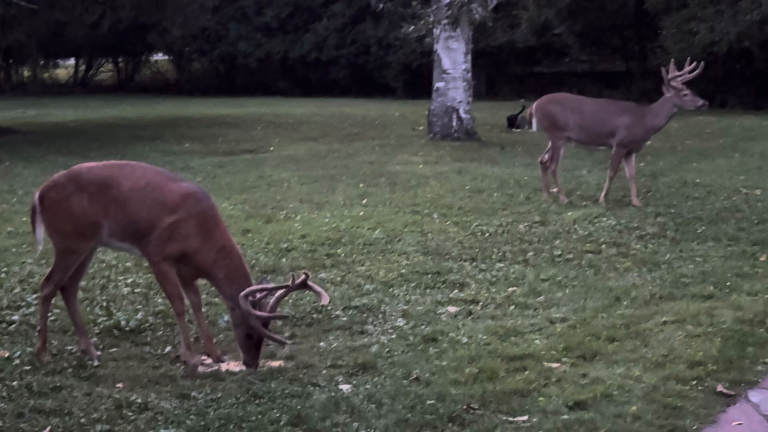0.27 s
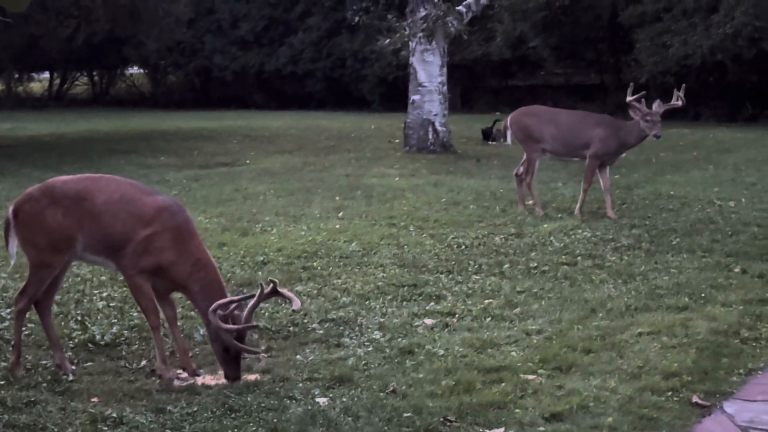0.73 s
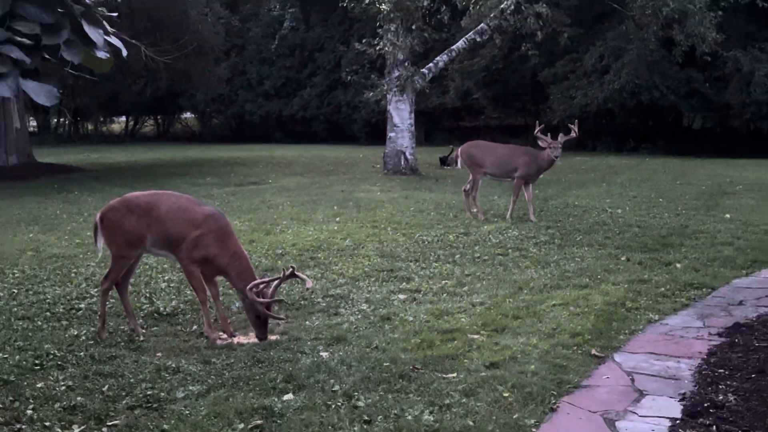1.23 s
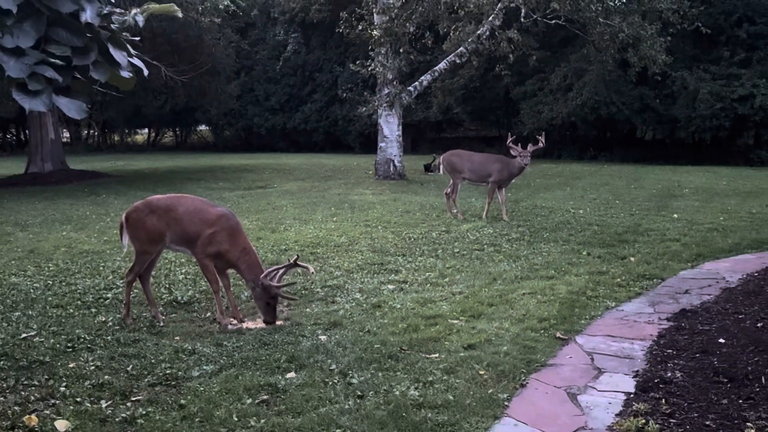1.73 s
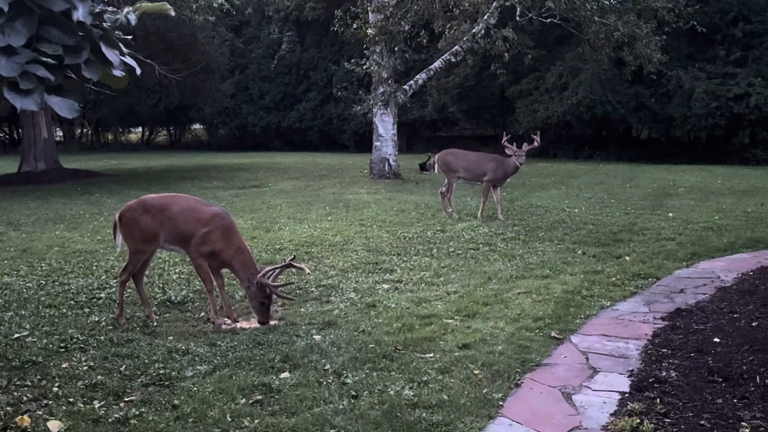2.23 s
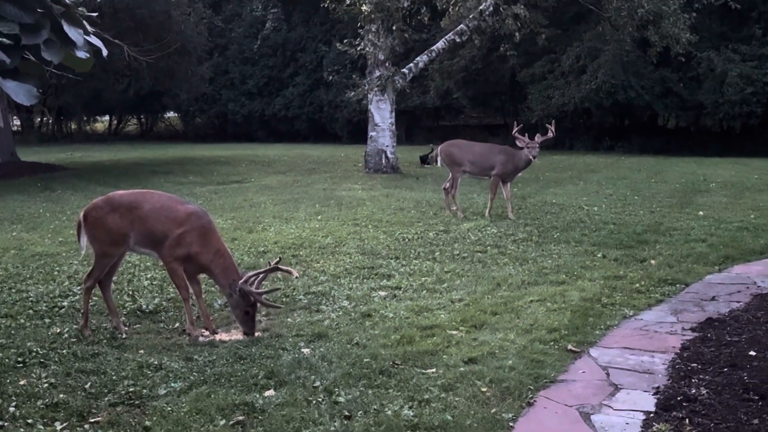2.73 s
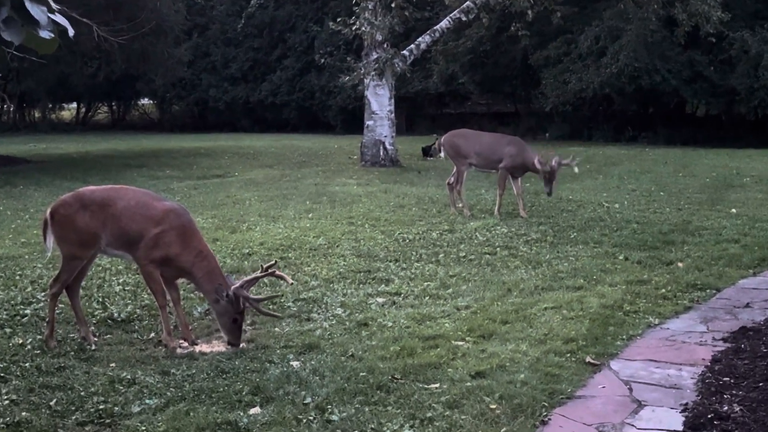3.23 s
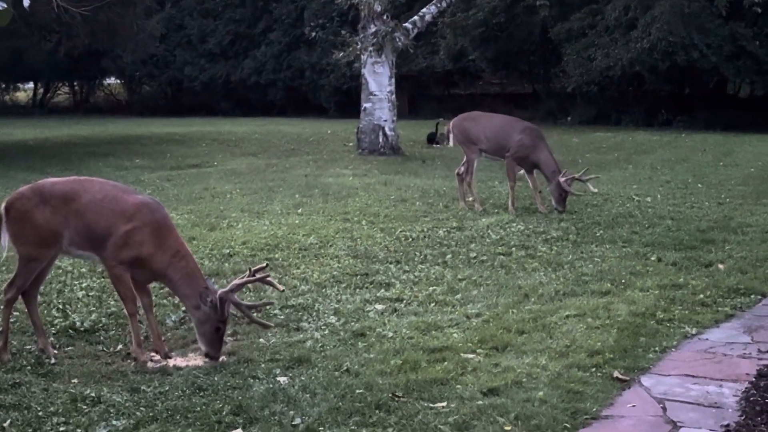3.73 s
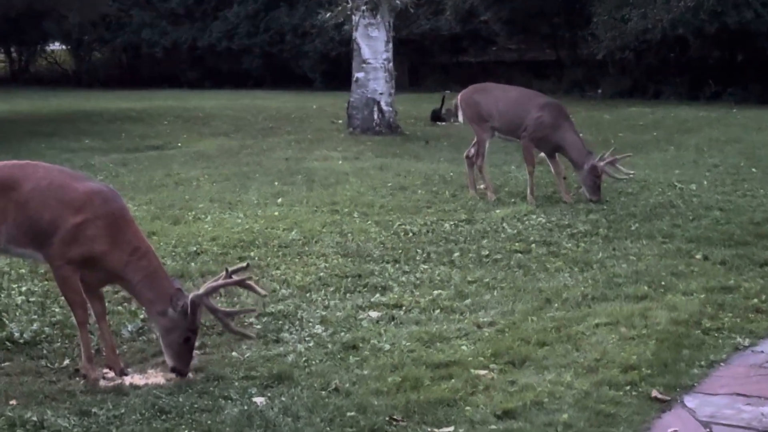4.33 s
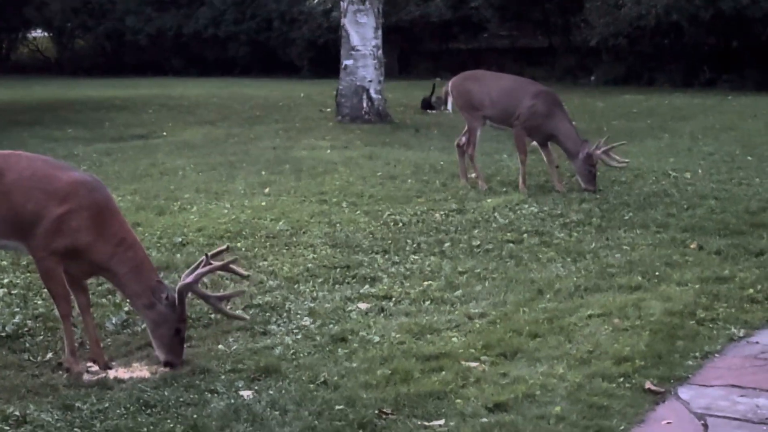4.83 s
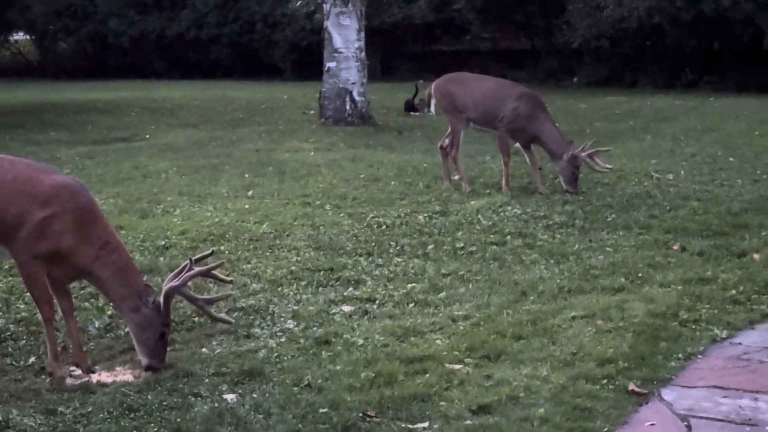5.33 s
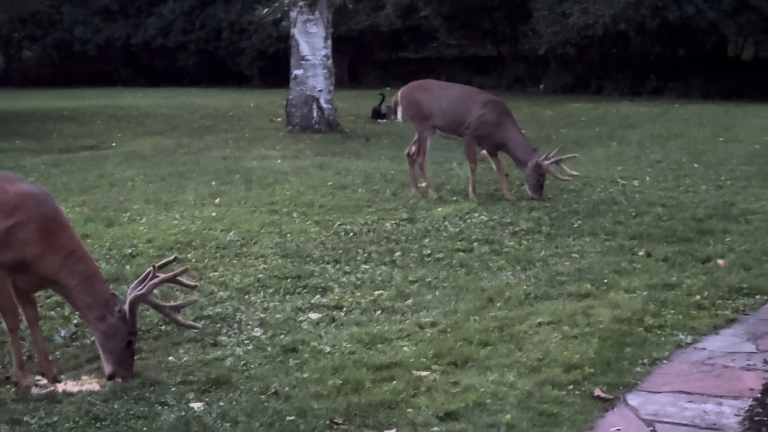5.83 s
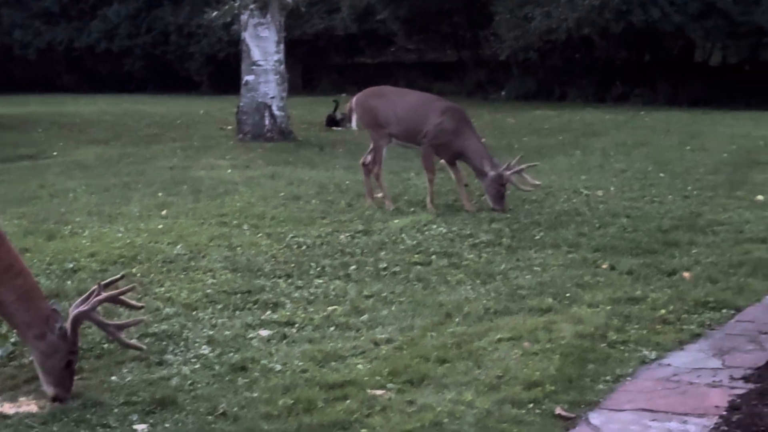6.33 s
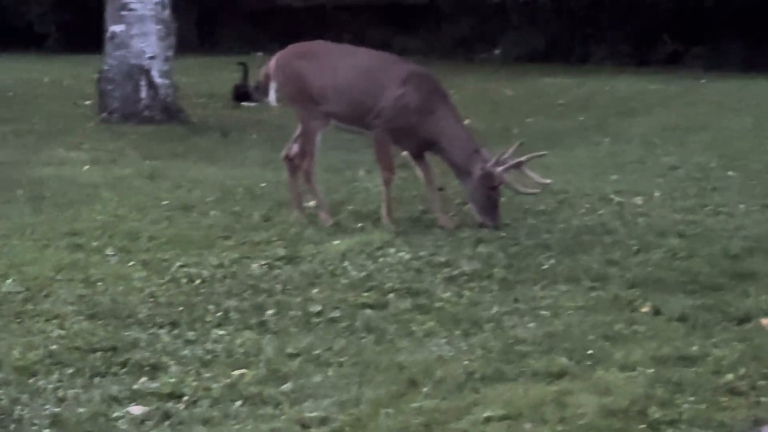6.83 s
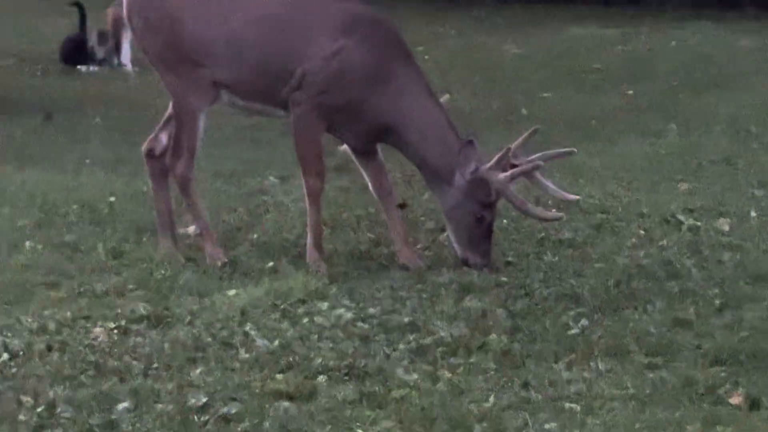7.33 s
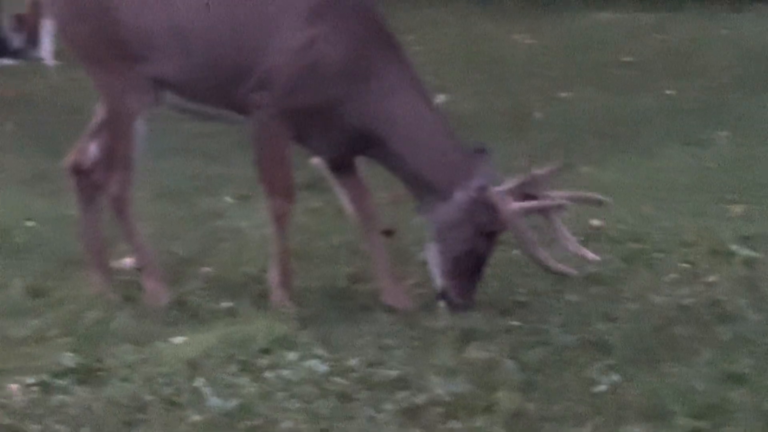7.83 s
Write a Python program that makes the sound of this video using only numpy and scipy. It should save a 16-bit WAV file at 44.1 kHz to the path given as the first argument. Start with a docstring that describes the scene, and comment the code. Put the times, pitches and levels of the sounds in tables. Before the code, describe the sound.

A close field cricket chirps in quick three-stroke bursts over far pulsing cricket trills and low distant traffic rumble on a dusk lawn.

```python
"""Field cricket on a suburban lawn at dusk

One cricket chirps close to the microphones, three or four wing strokes at a time: each stroke is
a falling note with partials and tooth rasp. Far off, tree and ground crickets trill as pulsed tones.
A ticking insect joins late with rising blips, a bird gives thin upward whistles, a few crackles rustle,
and beyond the hedges traffic rumbles as filtered noise with one faint, wavering tyre tone."""
import sys
import numpy as np
from scipy import signal
from scipy.fft import rfft, irfft
from scipy.io import wavfile

SR = 44100
rng = np.random.default_rng(int(sys.argv[2]) if len(sys.argv) > 2 else 0)


def waveform_to_disk(signal):
    """Save audio, clipped to [-1, 1], as 16-bit WAV at the path in sys.argv[1]."""
    frames = np.transpose(np.atleast_2d(signal))
    scaled = np.clip(frames, -1, 1) * 32767
    samples = np.round(scaled).astype(np.int16)
    wavfile.write(sys.argv[1], SR, samples)


N = 356328
TIME = np.arange(N) / SR  # s

# Near cricket, level through each stroke, with a brief dip early on: (share of the stroke/1, relative level/dB)
STROKE_ENVELOPE = [(0, -11.5), (.05, -5.5), (.13, -8.5), (.22, -14), (.36, -4), (.66, -2), (.8, 2.5),
                   (.95, -5.5), (1.081, -14)]
# Wing partials, first to third: (relative level/dB, resonance f/Hz, its width/Hz, left-right phase/rad)
WING_PARTIALS = [(-1, 5200, 1870, 0.48), (-6.5, 9100, 350, -0.16), (-8.5, 14140, 290, 0.055)]
# Rasp of the file teeth, spectrum: (f/Hz, relative level/dB)
RASP_SPECTRUM = [(3200, -44), (4000, -51), (5500, 19.5), (7400, 9), (8300, 13), (11000, 11.5), (12500, 3),
                 (14000, -10), (15800, 2)]
# Soft scratch of the opening wings, spectrum: (f/Hz, relative level/dB)
SCRATCH_SPECTRUM = [(3550, -17), (3850, 7.5), (4200, -20), (6400, -1), (7500, 1), (8600, -22), (10800, -5),
                    (12700, -28), (15000, -9), (16000, 0)]
# Chirps: (t/s, opening strokes left out/1, last stroke/1, rhythm stretch/1, stroke stretch/1, level/dB)
NEAR_CHIRPS = [(.706, 1, 4, 1.026, 0.9, -34.5), (1.699, 0, 3, 1.01, 0.82, -34),
               (2.5874, 0, 3, 1.015, 0.79, -34), (3.259, 0, 3, 1, 0.97, -34),
               (4.1742, 0, 3, 0.98, 0.84, -33), (4.9595, 0, 3, 1.01, 0.86, -33),
               (5.627, 0, 4, 1.0, 1, -33.5), (6.551, 0, 3, 1.04, 1.04, -33.5),
               (7.283, 0, 3, 1, 1.09, -34.5)]
# Strokes every chirp draws on, ever wider apart: (t into the chirp/s, length/s, relative level/dB)
STROKE_PATTERN = [(0, 0.0093, -5), (0.0342, .0148, -.6), (0.0737, .0172, 0.5), (.1228, 0.015, 0.5)]
# Thin rising bird calls: (t/s, length/s, first f/Hz, last f/Hz, level/dB)
BIRD_CALLS = [(.902, 0.015, 5860, 7060, -51), (2.45, 0.018, 5800, 7500, -57),
              (4.225, 0.013, 6370, 7630, -54), (5.746, 0.029, 6000, 7450, -57),
              (7.539, 0.019, 6030, 6800, -56)]
# Small dry rustles: (t/s, level/dB)
RUSTLE_TIMES = [(.503, -66), (4.683, -61), (6.676, -51.5), (6.691, -52)]
# Far choruses: (middle f/Hz, spread of f/Hz, stroke rate/Hz, level before the hedges/dB)
CHORUS_GROUPS = [(2401, 60, 49, -61.5), (2651, 76, 59, -64), (3091, 54, 33.5, -75.5),
                 (5422, 120, 71, -66.5), (5106, 190, 74, -73), (6050, 440, 80, -77)]
# Brief far trills: (t/s, f/Hz, level/dB)
FAR_TRILLS = [(.07, 3660, -81), (1.43, 4380, -75), (3.456, 4440, -75), (3.482, 4560, -77),
              (4.29, 3670, -81), (5.163, 4620, -71), (6.016, 3700, -78), (6.952, 4600, -77)]
# Traffic rumble, spectrum: (f/Hz, relative level/dB)
RUMBLE_SPECTRUM = [(20, -28), (32, -18), (48, -11.5), (60, 1.5), (76, 5), (92, -4), (115, -1.5),
                   (150, -6.5), (200, -12), (310, -20.5), (400, -21), (500, -25.5), (700, -66),
                   (1200, -120)]
# Road noise hanging in the air, spectrum: (f/Hz, relative level/dB)
AIR_SPECTRUM = [(200, -9), (400, -34), (540, 3.5), (800, 6.5), (1100, -3), (1500, -8.5), (2000, -14),
                (3600, -26), (5000, -24), (7300, -19.5), (8900, -37), (10500, -24.5), (12500, -34.5),
                (14500, -36.5), (16000, -43)]
# Tyres singing on a far road, before random drift: (t/s, f/Hz, level/dB)
TYRE_TONE = [(1.7, 381, -74), (2.3, 380.2, -59.5), (3.1, 385.4, -66.5), (3.9, 398, -62.5),
             (4.55, 400, -59.5), (4.75, 400, -72)]
# Stereo width set for the diffuse sound, almost mono near 6 kHz: (f/Hz, side filter gain/dB)
SIDE_WIDTH = [(30, -25), (60, -20.5), (110, -17.5), (200, -12), (380, -6.5), (560, -4.5), (1290, 1.5),
              (2380, -15), (3100, -12), (4400, -26.5), (6000, -53), (8000, -24), (15000, -9)]

TRILL_S = 0.3  # length of each far trill
# ticking insect: start, mean rest between runs, starting level and its growth
TICK_START_S, TICK_REST_S, TICK_DB, TICK_RISE_DB_PER_S = 6.19, .074, -52, 2.1
# one vehicle beyond the hedges: time of its peak, quick rise, height of the swell, slow ebb
VEHICLE_S, VEHICLE_RISE_S, VEHICLE_DB, VEHICLE_EBB_DB_PER_S = 6.88, 0.22, 3.5, 2.4
# above this pitch the left channel trails the right; nothing much passes above TOP_HZ
LAG_ABOVE_HZ, TREBLE_LAG_S, TOP_HZ = 8120, 0.00034, 15800


def undb(db):
    """Decibels to gain."""
    return 10 ** (np.asarray(db) / 20)


def level(x, db):
    """Set the rms level."""
    return x * undb(db) / np.sqrt(np.mean(x ** 2))


def colour(x, points):
    """Filter by a spectrum of (f/Hz, level/dB) points."""
    hz, db = np.transpose(points)
    bins = np.fft.rfftfreq(x.shape[-1], 1 / SR)
    gain = undb(np.interp(np.log(bins + 1), np.log(hz), db))
    return irfft(rfft(x) * gain, x.shape[-1])


def noise(points):
    """One channel of coloured noise."""
    return colour(rng.standard_normal(N), points)


def walk(rate):
    """Random drift with a spread near 1: rate knots per second joined by straight lines."""
    knots = rng.standard_normal(int(N / SR * rate) + 2)
    return np.interp(TIME * rate, np.arange(len(knots)), knots)


def add(track, s, sound):
    """Mix a sound into a track at a time."""
    start = max(int(s * SR), 0)
    part = track[..., start:start + sound.shape[-1]]
    part += sound[..., :part.shape[-1]]


def turn(hz):
    """Phase of a moving pitch."""
    return 2 * np.pi * np.cumsum(hz) / SR


def stereo(mid, side):
    """Left and right of diffuse sound: the filtered side is added to the mid and taken from it."""
    side = colour(side, SIDE_WIDTH)
    return np.array([mid + side, mid - side])


def scatter(x, t60):
    """Diffuse echo from leaves, trunks and walls: decaying noise tails that start after 4 ms."""
    t = TIME[:SR]
    tails = rng.standard_normal((2, SR)) * undb(-60 * t / t60) * (t > .004)
    tails /= np.sqrt(np.sum(tails ** 2, axis=1, keepdims=True))
    mid, side = (signal.fftconvolve(x, tail)[:N] for tail in tails)
    return stereo(mid, side)


def field_cricket(end_hz=4390, fall_hz_per_s=26000, brake_hz=90, waver_hz=45,
                  rasp_db=-30, catch_db=9, scratch_db=-59.5, scratch_s=0.024, lead_s=0.0039,
                  near_db=-16, near_t60=0.088, yard_db=-21, yard_t60=0.27):
    """Each wing closure drags a scraper over a file; it slows, so the note falls through the resonances."""
    direct, scrape, opening = np.zeros((2, N)), np.zeros(N), np.zeros(N)
    share, shape_db = np.transpose(STROKE_ENVELOPE)
    waver, grip = walk(700), [walk(600) for _ in WING_PARTIALS]
    for s, length, db in strokes():
        t = TIME[:int(length * share[-1] * SR)]
        here = slice(int(s * SR), int(s * SR) + len(t))
        # no two strokes are quite alike in pitch or in the timing of their swell and dip
        detune, skew = 2 * rng.random(2) - 1
        progress = (t / length) ** (1 + 0.26 * skew)
        loudness = undb(db + np.interp(progress, share, shape_db))
        hz = end_hz + 35 * detune + fall_hz_per_s * (length - t)
        hz = hz - brake_hz * (t / length) ** 6 + waver_hz * waver[here]
        for k, (partial_db, wing_hz, width_hz, lead) in enumerate(WING_PARTIALS, 1):
            # uneven tooth strikes shake the upper partials most
            shaken = undb(partial_db + 0.53 * k * grip[k - 1][here])
            size = loudness * shaken / np.hypot(1, 2 * (k * hz - wing_hz) / width_hz)
            left_right = np.array([[lead], [-lead]]) / 2
            add(direct, s, size * np.sin(k * turn(hz) + left_right))
        # the teeth rasp, hardest as the scraper first catches
        add(scrape, s, loudness + undb(db + catch_db) * np.exp(-t / 0.0053))
        # just before, the wings part with a faint scratch
        add(opening, s - lead_s - scratch_s, undb(scratch_db) * np.hanning(int(scratch_s * SR)))
    direct += scrape * level(noise(RASP_SPECTRUM), rasp_db)
    direct += opening * undb(1.6 * walk(350)) * level(noise(SCRATCH_SPECTRUM), 0)
    # nearby leaves answer at once; the yard answers longer and duller
    leaf_colour = [(5000, 2.5), (9000, 4.5), (13000, 7.0)]
    yard_colour = [(3000, 14), (4100, 13), (4600, 2), (7500, -11), (9000, -17), (14000, -6), (15500, -12)]
    near = scatter(colour(direct[0], leaf_colour), near_t60)
    yard = scatter(colour(direct[0], yard_colour), yard_t60)
    return direct + undb(near_db) * near + undb(yard_db) * yard


def strokes():
    """Every wing stroke as (t/s, length/s, level/dB): chirps share one pattern, each at its own pace."""
    return [(s + pace * after, stretch * length, db + accent_db)
            for s, skipped, last, pace, stretch, db in NEAR_CHIRPS
            for after, length, accent_db in STROKE_PATTERN[round(skipped):round(last)]]


def ticker(gap_s=.0205, tick_s=.006, first_hz=6170, step_hz=90, sweep_hz=290, grow_db=3.0,
           echo_db=-8, rest_spread=.3, count=24):
    """An insect's quick runs of two or three upward ticks, each higher and louder than the one before."""
    out, s = np.zeros(N), TICK_START_S
    swell = np.hanning(int(tick_s * SR))
    upward = np.linspace(-1, 1, len(swell))
    for extra, rest, detune, *reach in rng.uniform(-1, 1, (count, 6)):
        ticks = 2 + int(extra > 0)
        db = TICK_DB + TICK_RISE_DB_PER_S * (s - TICK_START_S)
        for k in range(ticks):
            hz = first_hz + step_hz * k + 50 * detune + sweep_hz * (1 + reach[k]) * upward
            tick_db = db - grow_db * (ticks + 0.5 - k)
            add(out, s + k * gap_s - tick_s / 2, undb(tick_db) * swell * np.sin(turn(hz)))
        s += (ticks - 1) * gap_s + TICK_REST_S * (1 + rest_spread * rest)
    return out + undb(echo_db) * scatter(colour(out, [(6200, 6.2), (6900, 8.5)]), 0.23)


def bird(echo_db=1):
    """Short upward whistles from the trees, each a gliding sine with its echo."""
    out = np.zeros(N)
    for s, length, first_hz, last_hz, db in BIRD_CALLS:
        size = int(length * SR)
        glide = np.linspace(first_hz, last_hz, size)
        add(out, s, undb(db) * np.hanning(size) * np.sin(turn(glide)))
    return out + undb(echo_db) * scatter(out, 0.24)


def rustles(decay_s=0.0043):
    """A few soft dry crackles: noise bursts that start at once and die away."""
    bursts = np.zeros(N)
    for s, db in RUSTLE_TIMES:
        add(bursts, s, undb(db) * np.exp(-TIME[:SR // 10] / decay_s))
    return bursts * level(noise([(800, 0), (2000, 3), (7000, -4), (15000, -14)]), 0)


def trill(hz, rate, sag, overtone_db=-29):
    """One cricket's unbroken run of strokes, each sagging a little in pitch."""
    stroke = np.cumsum(rate * (1 + .025 * walk(5))) / SR + rng.random()
    stroke -= np.floor(stroke)  # 0 to 1 within each stroke
    swell = (stroke * (1 - stroke)) ** 2
    wave = np.sin(turn(hz * (1 + sag * (1 - 2 * stroke) + .014 * walk(90))))
    octave = 2 * wave ** 2 - 1
    return swell * (wave + undb(overtone_db) * octave)


def chorus(count=12, size=8, breeze=9, hedge_t60=0.39):
    """Far groups of trilling crickets, blurred by the hedges they sit in."""
    voices = np.zeros(N)
    rank = (np.arange(count) + .5) / count
    offsets = np.log(rank / (1 - rank)) / np.sqrt(2)  # most sing near the middle pitch
    for hz, spread_hz, rate, db in CHORUS_GROUPS:
        for offset in offsets:
            own_rate = rate * (1 + .03 * rng.standard_normal())
            voice = trill(hz + spread_hz * offset, own_rate, sag=spread_hz / hz)
            voices += level(voice, db) / np.sqrt(count)
    # moving air shifts the sound from one path to another, so the chorus shimmers
    paths = np.array([walk(breeze) for _ in range(size)])
    paths /= np.linalg.norm(paths, axis=0)
    return sum(scatter(path * voices, hedge_t60) for path in paths)


def far_trills(rate=45, sag_hz=60, waver_hz=35):
    """Single far crickets that sing for a moment: throbbing tones that sag with every stroke."""
    out, waver = np.zeros(N), walk(87)
    t = TIME[:int(TRILL_S * SR)]
    throb = 1 + .35 * np.sin(2 * np.pi * rate * t)
    fade = signal.windows.tukey(len(t), .5)
    for s, hz, db in FAR_TRILLS:
        pitch = hz + sag_hz * (1 - 2 * (rate * t % 1)) + waver_hz * waver[int(s * SR):][:len(t)]
        add(out, s, undb(db) * fade * throb * np.sin(turn(pitch)))
    return (out + scatter(out, 0.054)) / np.sqrt(2)


def traffic(deep_db=-47.5, drone_db=-48.5, air_db=-60.0, left_db=3.0, heave_db=1.3, heave_rate=6,
            drone_heave_db=.5, approach_db_per_s=0.19):
    """Far engines heave as low noise, one vehicle swells late, road noise hangs and one set of tyres sings."""
    since = TIME - VEHICLE_S
    swell_db = VEHICLE_DB * np.clip(1 + since / VEHICLE_RISE_S, 0, 1)
    swell_db -= VEHICLE_EBB_DB_PER_S * np.maximum(since, 0)
    swell_db += approach_db_per_s * np.minimum(since, 0)  # the drone creeps up long before

    rumble = stereo(*colour(rng.standard_normal((2, N)), RUMBLE_SPECTRUM))
    low = colour(rumble, [(100, 0), (120, -60)])
    deep = level(low * undb(heave_db * walk(heave_rate) + 0.34 * swell_db), deep_db)
    drone = level(rumble - low, drone_db) * undb(swell_db + drone_heave_db * walk(heave_rate))

    air = level(stereo(*colour(rng.standard_normal((2, N)), AIR_SPECTRUM)), air_db)
    air *= undb(0.65 * walk(1.44) + 0.058 * swell_db)
    air[0] = colour(air[0], [(700, 0.02), (1300, left_db), (3000, 0)])  # the road hiss leans left

    s, hz, db = np.transpose(TYRE_TONE)
    whine_db = np.interp(TIME, s, db, left=-120, right=-120) + 3.3 * walk(11)
    whine_hz = np.interp(TIME, s, hz) + 4.2 * walk(40)
    return deep + drone + air + undb(whine_db) * np.sin(turn(whine_hz))


def scene():
    """The whole garden, near cricket to far road."""
    near = field_cricket() + ticker() + bird() + rustles()
    return near + chorus() + far_trills() + traffic()


def record(dry):
    """Two channels: the left lags in the high treble, and a steep low-pass cuts the top."""
    above_hz = np.maximum(np.fft.rfftfreq(N, 1 / SR) - LAG_ABOVE_HZ, 0)
    left = irfft(rfft(dry[0]) * np.exp(-2j * np.pi * above_hz * TREBLE_LAG_S), N)
    top_cut = signal.ellip(10, .2, 70, TOP_HZ, fs=SR, output="sos")
    return signal.sosfilt(top_cut, np.array([left, dry[1]]))


dry = scene()
out = record(dry)
waveform_to_disk(out)
```